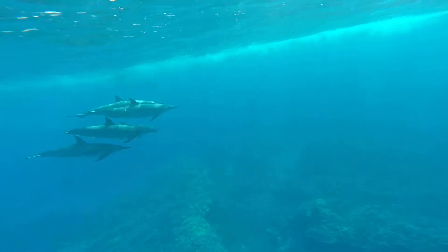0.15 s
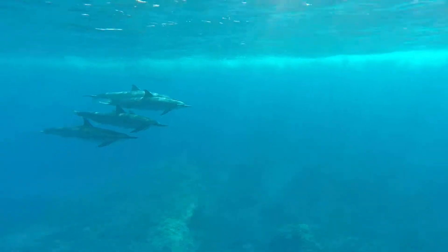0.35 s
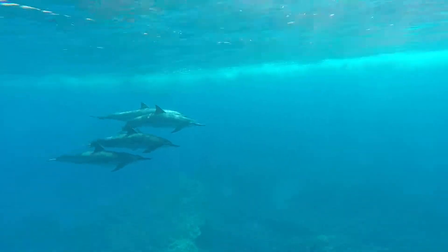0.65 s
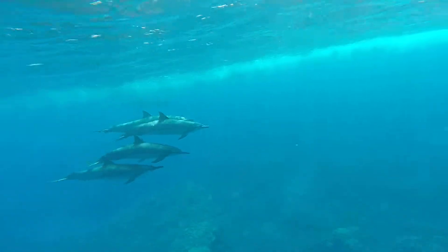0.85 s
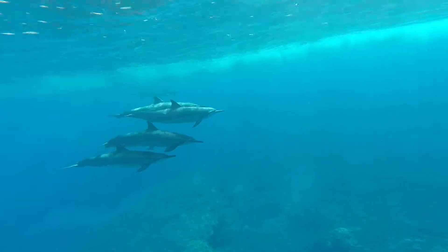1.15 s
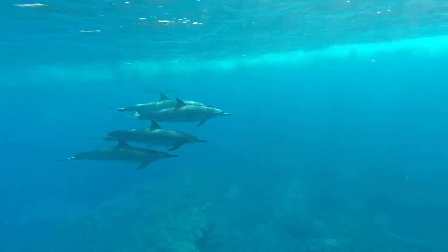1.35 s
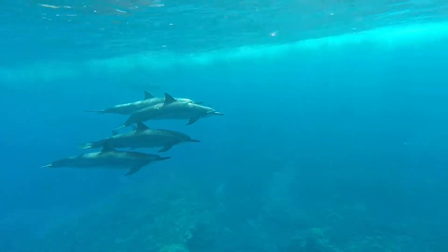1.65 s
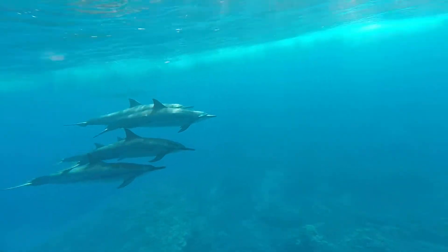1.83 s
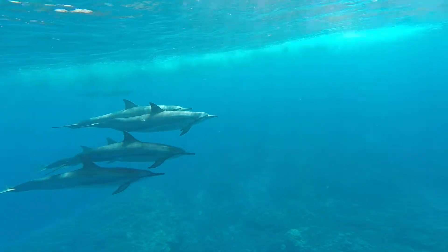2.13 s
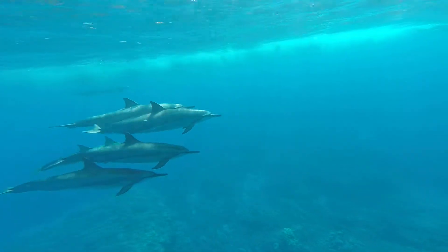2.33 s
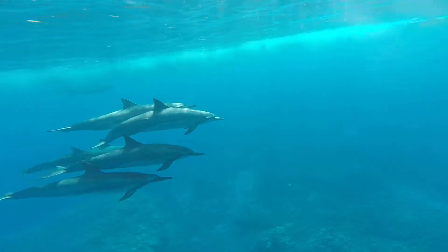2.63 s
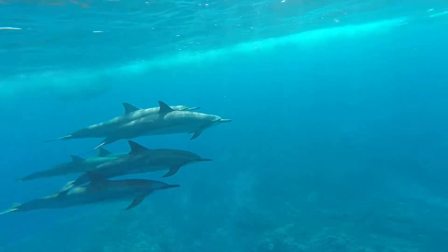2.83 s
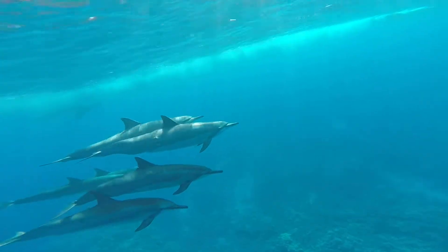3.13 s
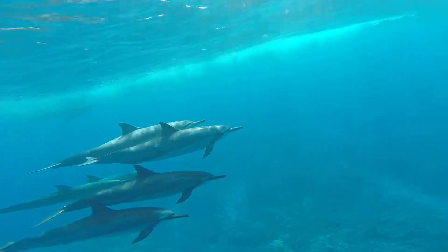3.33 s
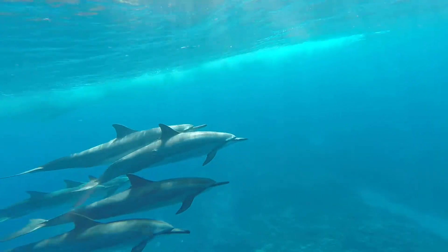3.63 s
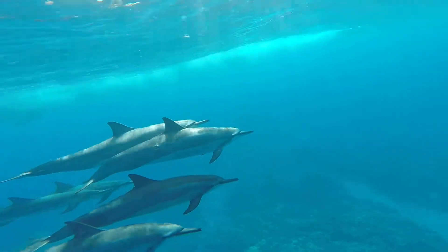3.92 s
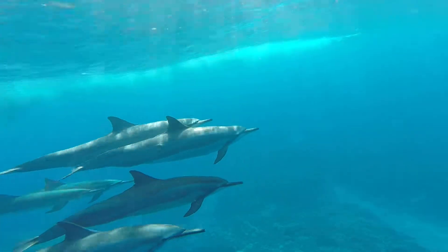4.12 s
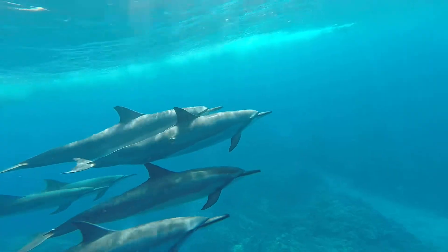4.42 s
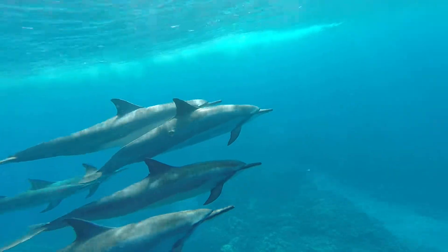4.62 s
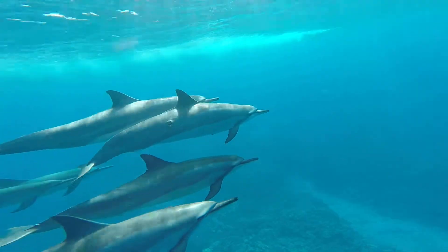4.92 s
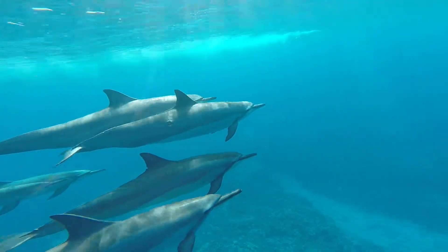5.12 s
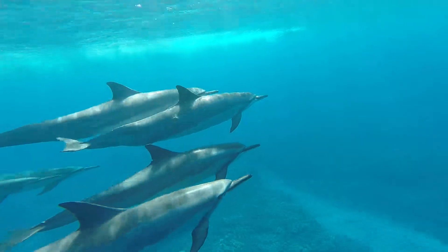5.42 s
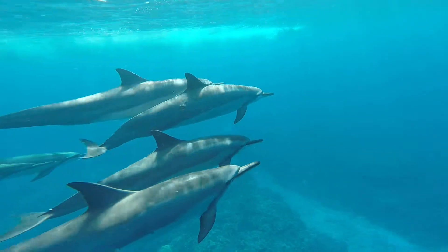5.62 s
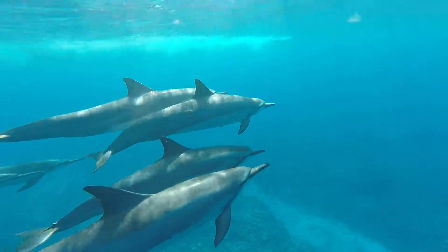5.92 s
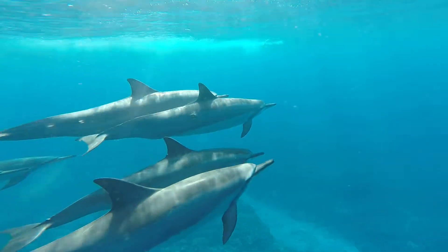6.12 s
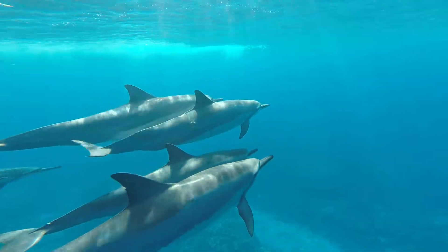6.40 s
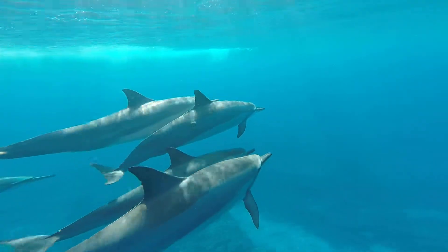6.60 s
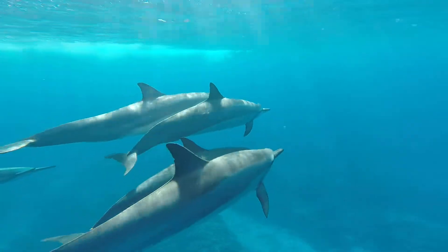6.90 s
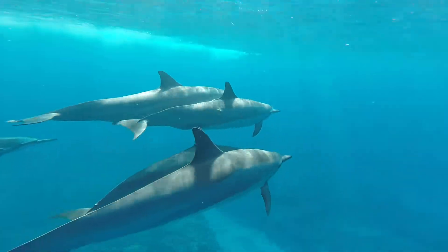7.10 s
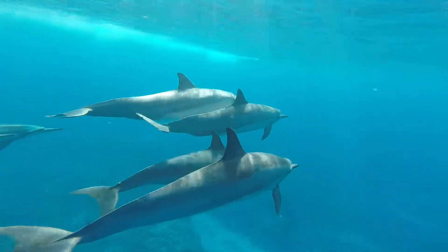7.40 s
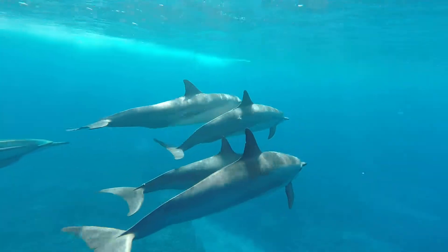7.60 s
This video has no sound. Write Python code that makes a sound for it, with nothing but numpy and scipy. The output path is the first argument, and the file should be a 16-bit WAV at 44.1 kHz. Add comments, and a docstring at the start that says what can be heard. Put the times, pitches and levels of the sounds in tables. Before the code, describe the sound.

Underwater in open sea, heard through a sealed housing: deep uneven swell rumble and a muffled wash that slowly thins. Sparse ticks and small bubble blips come first; around three seconds dolphins send a heavy, hollow knocking click train overlapped by a quicker brighter one. A calmer stretch follows with faint high whistles, then a very short buzz and a final even run of close clicks.

```python
"""Under the surface over a reef, a camera drifts in a sealed housing. Swell and flow are slow shaped-noise rumbles;
surf wash is shaped noise too, and fine bubbles and snapping shrimp are ticks sent through the housing resonances.
Dolphins close by send click trains, pulses that knock those resonances, and faint high whistles, gliding sines.
Bubbles against the case are short rising tones; splashy noise bursts, some of them tails of the buzz clicks, die
fast. Smooth self-noise lies under all.
"""
import sys
import numpy as np
from scipy import signal
from scipy.fft import rfft, irfft, next_fast_len
from scipy.io import wavfile
from scipy.ndimage import uniform_filter1d, map_coordinates

SR = 44100
rng = np.random.default_rng(int(sys.argv[2]) if len(sys.argv) > 2 else 0)


def log_audio(samples):
    """Write samples as a 16-bit WAV file to the path given in sys.argv[1]."""
    # one column per channel
    frames = np.atleast_2d(samples).T
    # limit to full scale, then quantise
    limited = np.clip(frames, -1, 1)
    pcm = np.round(limited * 32767).astype(np.int16)
    wavfile.write(sys.argv[1], SR, pcm)


N = 341775


def amp(db):
    """Amplitude factor of a level in dB."""
    return 10 ** (np.asarray(db) / 20)


def unit(x):
    """x scaled to rms 1."""
    return x / np.sqrt(np.mean(x ** 2) + 1e-20)


def curves(rows):
    """One value per sample for each column after the time."""
    s, *columns = np.transpose(rows)
    return [np.interp(np.arange(N) / SR, s, column) for column in columns]


def wobble(knots_per_s):
    """Smooth random curve through random knots."""
    knots = rng.standard_normal(int(N * knots_per_s / SR) + 4)
    return map_coordinates(knots, [np.arange(N) * knots_per_s / SR])


def filtered(x, response):
    """x times a complex response of frequency."""
    m = next_fast_len(N + SR // 2)
    return irfft(rfft(x, m) * response(np.fft.rfftfreq(m, 1 / SR)), m)[..., :N]


def shaped(spectrum):
    """Noise of rms 1; spectrum points joined on a log frequency axis."""
    point_hz, point_db = np.transpose(spectrum)

    def response(hz):
        return amp(np.interp(np.log(hz + 1), np.log(point_hz), point_db, -120, -120))

    return unit(filtered(rng.standard_normal(N), response))


def ringing(x, modes):
    """x through parallel causal resonances of alternating sign."""
    def response(hz):
        total = 0
        for k, (centre_hz, width_hz, gain_db) in enumerate(modes):
            damping = 1j * hz * width_hz
            total = total + (-1) ** k * amp(gain_db) * damping / (centre_hz ** 2 - hz ** 2 + damping)
        return total

    return filtered(x, response)


def patchy(patchy_db):
    """White noise with patches of random gain in time and frequency."""
    z = signal.stft(rng.standard_normal(N + 512), nperseg=512)[2]
    field = uniform_filter1d(rng.standard_normal(z.shape), 8, 0)
    field = uniform_filter1d(field, 6, 1)
    return unit(signal.istft(z * amp(patchy_db * unit(field)), nperseg=512)[1][:N])


def grains(count, centre_hz, spread, cycles, range_db):
    """Scattered damped ticks, each at its own pitch; many faint, few loud."""
    when, size = rng.random((2, count))
    hz = np.clip(centre_hz * np.exp(spread * rng.standard_normal((count, 1))), 300, 15000)
    turn = hz * np.arange(SR // 150) / SR
    tick = turn * np.exp(-2 * turn / cycles) * np.sin(2 * np.pi * turn)
    tick = amp(range_db * size[:, None] ** 3) * np.sqrt(hz) * tick
    at = (when * N).astype(int)[:, None] + np.arange(turn.shape[1])
    return unit(np.bincount(at.ravel(), tick.ravel(), N + SR)[:N])


# rumble levels: time_s, swell_db, flow_db
RUMBLE_LEVELS = [(0.0, -27.5, -39), (0.5, -37.5, -37.5), (1.38, -26, -45), (1.73, -23.5, -41),
                 (1.75, -34.5, -37), (3.06, -24.5, -47), (3.37, -35, -47), (3.54, -28.5, -37.5),
                 (3.58, -37.5, -45), (3.99, -33, -45), (4.25, -37, -53), (4.32, -26, -42.5),
                 (4.55, -36.5, -49), (4.77, -26, -40), (5.07, -38, -48.5), (5.16, -29.5, -49),
                 (7.66, -38, -48.5), (7.75, -37, -53)]
# wash levels: time_s, surf_db, boom_db
WASH_LEVELS = [(0.0, -41, -42), (0.5, -46.5, -43.5), (2.2, -45.5, -41), (2.44, -47.5, -44),
               (2.91, -45.5, -43.5), (3.26, -43.5, -43), (4.47, -47.5, -44.5), (4.75, -45.5, -43.5),
               (5.31, -52, -47), (5.76, -50, -47), (5.87, -54, -49), (6.58, -54.5, -52), (7.16, -57, -52),
               (7.29, -48, -54), (7.45, -53, -56.5), (7.75, -61, -49)]
# noise spectra, relative: freq_hz, density_db_per_hz
SWELL = [(6, -52), (14, 17), (30, 12), (45, -7.5), (70, -18)]
FLOW = [(30, -62), (48, -2.5), (65, 3.5), (90, -8), (130, -18.5), (200, -30)]
SURF = [(70, -22), (120, -0.5), (170, -1.5), (220, -0.5), (350, -3), (500, -2), (900, -38), (1400, -21),
        (4000, -32)]
# housing resonances, low knock to air: centre_hz, width_hz, gain_db
KNOCK = [(564, 178, 1.5), (769.6, 166.4, 2.5)]
EDGE = [(870, 590, 5), (995, 400, 6), (1132, 80, -1), (1311, 50, -0.5)]
LOW_RING = [(1623, 88, 2.5), (1916, 273, -5)]
HIGH_RING = [(2266, 320, -8), (2782, 154, 0.5)]
SNAP = [(3590, 530, -0.78), (3934, 290, 1.7), (4510, 310, -1.3)]
TREBLE = [(4900, 210, -9), (6065, 520, -2), (7400, 850, -1.5)]
AIR = [(8790, 260, -2.5), (10150, 350, 0), (10950, 850, -7.5), (12350, 520, -7), (14000, 1000, -11.5),
       (14400, 500, -22)]
# middle modes: start level, fade as the surf recedes, share of the boom's swings
RING_DB, RING_FADES_DB_PER_S, RING_FOLLOWS = -52, 1.0, 0.17
HIGH_KEEPS_DB_PER_S = 0.73  # the high ring fades this much slower
HISS_DB = -61.5


def water():
    """Swell and flow rumble; surf wash, fine bubbles and shrimp snaps excite the housing."""
    time_s = np.arange(N) / SR
    swell_db, flow_db = curves(RUMBLE_LEVELS)
    surf_db, boom_db = curves(WASH_LEVELS)
    boom_swing_db = boom_db - uniform_filter1d(boom_db, size=2 * SR)
    ring_db = RING_DB - RING_FADES_DB_PER_S * time_s + RING_FOLLOWS * boom_swing_db
    rumble = amp(swell_db + 3.2 * wobble(5.8)) * shaped(SWELL) + amp(flow_db + 1.2 * wobble(9)) * shaped(FLOW)
    surge = wobble(25)  # slaps of water, shared by surf, boom and ring
    surf = amp(surf_db + 2.33 * wobble(9) + 0.73 * surge) * shaped(SURF)
    boom = unit(ringing(ringing(patchy(patchy_db=2.5), KNOCK), [(569, 444, 0)]))
    boom = amp(boom_db + 0.23 * surge) * boom

    fizz = grains(count=1500, centre_hz=2157, spread=0.396, cycles=5.6, range_db=9.0)
    shrimp = grains(count=4000, centre_hz=8170, spread=0.395, cycles=2.4, range_db=18.5)
    far = grains(count=3000, centre_hz=12300, spread=0.16, cycles=3.0, range_db=20.0)  # thin, no body
    drive = patchy(patchy_db=1.5) + amp(-12.0) * fizz + amp(-6.0) * shrimp

    edge = amp(-5.5) * ringing(drive, EDGE[2:])
    low = amp(1.35 * wobble(12)) * ringing(drive, LOW_RING)
    high_db = -6.5 + HIGH_KEEPS_DB_PER_S * time_s + 1.1 * wobble(14)
    high = amp(high_db) * ringing(drive, HIGH_RING)
    ring = amp(ring_db + 0.81 * surge) * unit(edge + low + high)

    snap = amp(1.8 * wobble(7)) * ringing(drive, SNAP)
    hiss = unit(snap + amp(-2.0) * ringing(drive, TREBLE) + amp(-10.0) * ringing(drive, AIR))
    hiss = amp(HISS_DB + 0.48 * wobble(10)) * hiss
    return rumble + surf + boom + ring + hiss + amp(-75.0) * far


def bursts(times_s, db, life_s, wake):
    """A pulse of energy set by db at each time, partly spread into a brief noisy wake."""
    t = np.arange(SR // 50) / SR
    shape = wake * t / life_s * np.exp(-t / life_s) * rng.standard_normal((len(times_s), len(t)))
    shape[:, 12] -= 1
    shape /= np.linalg.norm(shape, axis=1, keepdims=True)
    at = np.round(times_s * SR).astype(int)[:, None] + np.arange(len(t))
    return np.bincount(at.ravel(), (amp(db)[:, None] * shape).ravel(), N + SR)[:N]


def leaning(s, db, lean_db, modes, life_s, wake):
    """Pulses into a pair of modes, with the weight shifted to the upper one by lean_db."""
    lower = ringing(bursts(s, db - lean_db / 2, life_s, wake), [modes[0]])
    upper = ringing(bursts(s, db + lean_db / 2, life_s, wake), [modes[1]])
    return lower - upper


# strong clicks by sender: slow heavy train, even brighter train, quick buzz, close even train, then
# single clicks: snaps (probably shrimp), a few water slaps, a faint echo;
# knock and ring relative to treble, snap and air to the sender's colour:
# start_s, treble_db, knock_db, ring_db, snap_db, air_db
CLICKS = [
    [(2.9964, -50, 16, 4, 8.0, 2.0), (3.0694, -47, 18, 4.5, 8.0, 0), (3.1388, -44.5, 17.8, 4.5, 6.5, 1.0),
     (3.2374, -43, 19.7, 3.5, 3, 2.5), (3.3538, -36.5, 15.8, -0.5, -0.5, 0.0),
     (3.5089, -35.5, 13.3, 0.5, 1.0, -1), (3.5783, -36, 14.3, -0.5, -0.5, 1),
     (3.6561, -36, 11.4, -0.5, -1.0, 3), (3.7404, -35, 9.4, -1.0, -5.5, 4),
     (3.8437, -35.5, 11, -2, -6.5, 2), (3.9534, -36.0, 11.0, -2, -2.0, -0.5),
     (4.0382, -37.5, 12.6, 0.5, 0.0, 1), (4.1325, -39, 13.0, 1.5, -0.0, 0.5),
     (4.2453, -43.5, 13, 1, 1.5, 1)],
    [(3.2535, -34.0, 10, -8.0, 2.0, 0.5), (3.2939, -34.0, 10, -7, -0.5, -0.5),
     (3.3348, -35.5, 9.5, -8, -1, -0.5), (3.3772, -37.0, 11, -5, 3, 2), (3.4186, -38, 9, -6.5, 2.5, 2.5),
     (3.458, -37.0, 7.0, -8, -1, 2), (3.5059, -35.5, -1, -13, 0, 1), (3.5613, -39, -23, -14, -6, -7)],
    [(6.8783, -36.0, 3.0, 3.5, 0.5, 5), (6.8967, -35.5, 1.5, 0.5, -3, 4.0), (6.9107, -38.5, 1.4, -3, 2, -2),
     (6.9234, -39.5, 1.1, -4, -3, -7.0), (6.9374, -48, 4.9, 4.5, 2.5, -7.5)],
    [(7.1566, -35.5, 6.4, -6.0, 5, -2.5), (7.1821, -35.5, 9.2, -6.5, -5, -0.5),
     (7.215, -36, 8.8, -4.5, 0.0, 2), (7.2619, -35.0, 7.6, -5, -3.0, 1), (7.2918, -36.5, 7.5, -4, -2, 2),
     (7.3193, -33.5, 4.5, -7, -1.5, -0.0), (7.3452, -34.5, 3.0, -6, -2.0, -1),
     (7.3761, -35.0, 1.5, -7, -1, 1), (7.4096, -35.0, 2.7, -5.5, 0, -1), (7.45, -36, 2.5, -3.5, 2, 0.5)],
    [(0.0383, -51, -6, 11.5, 13, 4), (0.0957, -47, -7.0, -5, -1.0, 5.0), (0.184, -45, 3.0, -10.0, 4, -4),
     (0.2054, -44.5, 5, -2.5, 2, -5), (0.2718, -49, -5.5, -9.5, 0, -1.5),
     (0.318, -56, -6.0, -10.0, -7.5, -1.5), (0.4419, -50.5, 19.5, -7, -2, 4.0),
     (0.4873, -50, -4.0, 0.0, 1, 6.0), (0.6055, -52, -13, -13.0, 4.0, -1),
     (0.6943, -60, -7.0, -13.0, -6, -7.5), (0.7442, -65, -12, 9, -4, -3.0), (0.7894, -48, -4.5, -16, -6, 4),
     (0.8829, -50, 19, 5, -6, 5.5), (0.9787, -51, -6.5, -12.5, -10.0, -9.0),
     (1.0555, -53, -7.5, -2, -1.5, 8), (1.1473, -41, 0, -5.5, -10.0, 1.0),
     (1.1672, -46.5, 1, -4.5, 6.0, -1), (1.1884, -54, 16, 4, 14, -4.0), (1.2371, -45, -1, 0, 0, -12),
     (1.3224, -43, -1, -7, -3, 7), (1.4666, -49, -6.5, -10.5, 3, -4), (1.5753, -46.5, 8.0, 7.5, 0, -10.0),
     (1.6167, -36, 16, -1, 2.5, 2), (1.7459, -31, -6, -6.5, -3, -11), (2.0078, -44.0, 13.5, 1.5, -8.5, 1.0),
     (2.0864, -52, 14, 6, 10, -6.5), (2.0986, -45.0, 12, -6.0, 1.5, 3.5),
     (2.174, -48.0, -4.0, -8.0, -2.5, 5), (2.2099, -40.5, -17, -6, -3, -3), (2.2584, -52, 11, -1, 13, 1),
     (2.3032, -44.5, 15, -1, 1.0, 6), (2.3401, -46, -1.5, -6, 3, 5), (2.8365, -51.0, -2.0, -6.0, 6, -4.5),
     (2.8589, -33.5, -1, -7, -10, -8), (2.9058, -43.5, -5, -2.0, 3, 5),
     (3.1647, -42.5, 0.5, -12.5, -9.0, -4.0), (3.209, -47, -8.0, -12.0, -8.0, 3),
     (3.2321, -47, 2, -8, -2.0, -2.0), (3.392, -50.5, -5.5, -9.5, -6.5, 5.0),
     (3.497, -45.5, -11, -11.5, -4.5, 7.0), (3.727, -41, -7.5, -11.5, -7, -3),
     (3.8495, -48.5, -7.5, -11.5, -7.5, 5.5), (3.87, -47.0, -5.0, -7, -4.5, 8),
     (3.8816, -40.5, -10, 2.0, 0.5, -2), (3.9205, -43.0, -1.0, -6, -8.0, 0.0),
     (4.0744, -54, 15.0, 1.0, 11.0, 4.0), (4.1654, -43.5, -2.5, -7.5, -3.5, 1.5),
     (4.3041, -51, -6.0, -10.0, 3.0, -4.0), (4.3725, -40.5, 5.0, -9, 4, -0.5),
     (4.3929, -39, -13, -18.5, -4.5, -2.5), (4.4353, -43, -9.0, -5, -3, -3.5),
     (4.5052, -47, -9.5, -1, -4.0, -1.0), (4.566, -48, -3.0, -9.0, 1.0, -3.5),
     (4.6808, -45.5, -4, -14, 0, 4.0), (4.9995, -47, 4, -10.0, -5.0, 1),
     (5.1128, -37, -11.5, -17.5, -3.5, -6), (5.4016, -43.5, -5, -15, -1, 4), (5.6037, -48.0, 8, -14, 1, 6),
     (5.9115, -47, -5.5, -7, 1.5, -1), (5.9743, -50, 0, -14.0, 9, -5.5), (6.0706, -46, -7, -21.0, 6, -10.0),
     (6.1629, -46, -3, -4, -10.0, -5), (6.2174, -54, 2, -6.0, 2, 15), (6.2667, -49.5, 9.0, 1, 8, -3.0),
     (6.6444, -45, -6, -15, 3, 6), (6.988, -45, -6.5, -11, -1, -8), (7.0125, -44, -9.0, -11.0, 6.5, -2),
     (7.307, -56.0, 2.0, -2.0, 12.0, 9.5), (7.4929, -46.5, -11.5, -11.5, 2.0, -6.5),
     (7.5288, -51, 3, 1, 13, -9.0)],
]
# mode drive by sender, edge over knock, rings over ring, snap and air over treble:
# edge_db, low_ring_db, high_ring_db, snap_db, air_db
COLOURS = [(-24.5, 0.5, -3, -24, -14.5), (-26, 3.5, -3.5, -8.5, -12.5), (-4.5, -4.5, 3.5, 6, -19.5),
           (-12, -5, 0.1, -15.5, -11.5), (-23, -8.5, -5.5, -9, -15)]
# chance change of colour from click to click, by sender: scatter_db
SCATTER_DB = [1, 1, 1, 1, .5]
# favoured modes shift, probably as the animals turn: time_s, low_over_high_ring_db,
# upper_over_lower_knock_db, upper_over_lower_low_ring_db
LEAN = [(2.9, 7, 8, 0), (3.0, 10, 4, -1), (3.1, -1, 8.5, 2), (3.4, -4, 3, -3), (3.51, -8, 3, 15),
        (3.7, -5.5, 2.5, 9), (3.95, 1, 0, 10), (4.25, 7.5, 0, 6), (4.4, 4, 0, 0), (6.85, -9, 0, 0),
        (6.88, 6, -6, 2), (6.9, 1, 11, 9), (6.94, -7, 13, -1), (7.15, -6, -3.5, -6), (7.28, -6, -1.5, -13),
        (7.45, 1, -2.5, -12), (7.5, -7, 0, 0)]
# senders whose knock and low ring shift between their two modes: turns (1 or 0)
TURNS = [1, 0, 1, 1, 0]
# offset from the click time by sender: lag_s (bright: high ring, snap, treble, air)
KNOCK_LAG_S = [-.0003, .0003, -.0004, -.0007, -.0002]
EDGE_LAG_S = [0, -.0015, -.0003, -.001, 0]
BRIGHT_LAG_S = [.0006, .0008, .0005, .0002, .0003]
# noisy tail by sender, relative to the knock and to its edge: knock_tail_db, edge_tail_db
TAIL_DB = [(-17, -7), (-20, -7), (-11, -9), (-13, -7), (-18, -8)]


def clicks():
    """Each click strikes the mode groups of the housing; the balance of the groups belongs to its sender."""
    counts = [len(rows) for rows in CLICKS]

    def by_sender(values):
        return np.repeat(values, counts, axis=0)

    all_rows = [row for rows in CLICKS for row in rows]
    s, db, knock_db, ring_db, more_snap_db, more_air_db = np.transpose(all_rows)
    colour = by_sender(COLOURS)
    colour = colour + by_sender(SCATTER_DB)[:, None] * rng.standard_normal(colour.shape)
    edge_db, low_db, high_db, snap_db, air_db = colour.T
    knock_tail_db, edge_tail_db = by_sender(TAIL_DB).T
    when, *leans = np.transpose(LEAN)
    ring_lean_db, knock_lean_db, low_lean_db = (np.interp(s, when, lean) for lean in leans)
    half_lean_db, turns = ring_lean_db / 2, by_sender(TURNS)
    bright_s = s + by_sender(BRIGHT_LAG_S)
    edge_db = db + knock_db + edge_db + 40.5
    knock_db = db + knock_db + 38.5
    low_db = db + ring_db + low_db + half_lean_db + 41.0
    high_db = db + ring_db + high_db - half_lean_db + 40

    # a second, broad resonance after each group but air limits its spread
    knock_s = s + by_sender(KNOCK_LAG_S)
    knock = leaning(knock_s, knock_db, turns * knock_lean_db, KNOCK, life_s=.0003, wake=0)
    knock_tail = bursts(s + .002, knock_db + knock_tail_db, life_s=.003, wake=3)
    knock = ringing(knock + ringing(knock_tail, KNOCK), [(664, 345, 0)])

    blow = bursts(s + by_sender(EDGE_LAG_S), edge_db, life_s=0.00055, wake=0.14)
    blow = blow + bursts(s, edge_db + edge_tail_db, life_s=.002, wake=3)
    edge = ringing(ringing(blow, EDGE), [(1100, 1200, 0)])

    low = leaning(s, low_db, turns * low_lean_db, LOW_RING, life_s=0.0006, wake=0.12)
    low = ringing(low, [(1820, 830, 0)])

    high = bursts(bright_s, high_db, life_s=0.0008, wake=0.09)
    high = ringing(ringing(high, HIGH_RING), [(2620, 1300, 0)])

    snap = bursts(bright_s, db + snap_db + more_snap_db + 33.5, life_s=.0005, wake=0.1)
    snap = ringing(ringing(snap, SNAP), [(4000, 2400, 0)])

    treble = bursts(bright_s, db + 24.5, life_s=0.00062, wake=0.27)
    treble = ringing(ringing(treble, TREBLE), [(6640, 43000, 0)])

    air = bursts(bright_s, db + air_db + more_air_db + 33.5, life_s=0.0006, wake=0.25)
    return knock + edge + low + high + snap + treble + ringing(air, AIR)


# bubbles against the case, level before the envelope: start_s, level_db, start_pitch_hz, t60_s
BUBBLES = [(.15, -25.5, 212.5, 0.18), (.157, -21, 673, 0.045), (.641, -30, 694, 0.034),
           (0.829, -25, 522, 0.049), (.998, -22, 693, 0.022), (1.496, -26, 520, 0.035),
           (2.276, -17, 650, 0.024), (2.592, -29, 2840, 0.021), (2.593, -37, 3280, .02),
           (2.728, -24, 610, 0.036), (3.899, -24, 630, 0.12), (4.03, -22, 318, 0.026),
           (4.232, -20.5, 616, 0.037), (4.767, -29, 578, 0.084), (4.781, -26, 114, 0.17),
           (4.8, -33.5, 837, 0.12), (5.299, -23.5, 607, 0.028), (5.355, -28.5, 729, 0.035),
           (5.646, -25, 552, 0.11), (5.768, -25.5, 440, 0.085), (5.781, -32.5, 228, 0.19),
           (5.996, -22.5, 705, 0.047), (6.186, -33, 3360, 0.011), (7.434, -23.5, 527, 0.02),
           (7.64, -27.5, 124, 0.071)]


def bubbles():
    """Short soft-edged tones that rise a little."""
    out, t = np.zeros(N + SR), np.arange(SR // 4) / SR
    for s, db, hz, t60 in BUBBLES:
        waver = 0.82 * np.cumsum(rng.standard_normal(len(t))) / np.sqrt(t60 * SR)  # unsteady pitch
        shape = amp(-60 * t / t60) * (1 - np.exp(-t * 12 / t60))
        phase = 2 * np.pi * hz * t * (1 + 0.066 * t / t60) + waver
        out[round(s * SR):][:len(t)] += amp(db) * shape * np.sin(phase)
    return out[:N]


# splashy noise bursts, some of them tails of the buzz clicks:
# start_s, level_db, t60_s, low_part_over_level_db
SPLASHES = [(2.085, -57, .05, -10), (2.258, -55, .03, -14), (3.883, -48, .03, -10), (3.887, -48, 0.05, -10),
            (6.88, -59, 0.049, 13), (6.898, -54, .06, 15), (6.912, -52, 0.036, 19), (6.925, -55, 0.04, 8),
            (6.962, -53, 0.054, -5)]


def splashes():
    """Noise that starts at once, dies fast and rings the modes from low ring to treble and the knock's edge."""
    shape, edge_shape, t = np.zeros(N + SR), np.zeros(N + SR), np.arange(SR // 5) / SR
    for s, db, t60, edge_db in SPLASHES:
        shape[round(s * SR):][:len(t)] += amp(db - 60 * t / t60)
        edge_shape[round(s * SR):][:len(t)] += amp(db + edge_db - 60 * t / t60)
    edge = unit(ringing(ringing(rng.standard_normal(N), EDGE), [(1100, 980, 0)]))
    body = unit(ringing(rng.standard_normal(N), LOW_RING + HIGH_RING + SNAP + TREBLE))
    return shape[:N] * body + edge_shape[:N] * edge


# whistles, one list each, level before flutter: time_s, pitch_hz, level_db
WHISTLES = [
    [(5.545, 11500, -80), (5.563, 11000, -72), (5.58, 10650, -76), (5.605, 10150, -72), (5.615, 10200, -69),
     (5.623, 10250, -72)],
    [(5.685, 10650, -76), (5.702, 11000, -69), (5.722, 10520, -71), (5.737, 10500, -72), (5.76, 10900, -69),
     (5.785, 11250, -60), (5.802, 11250, -66), (5.812, 10750, -69), (5.845, 10400, -73)],
    [(6.05, 11000, -72), (6.1, 12000, -82), (6.14, 12900, -82), (6.162, 13110, -81), (6.212, 13013, -75),
     (6.252, 12478, -84), (6.27, 12062, -81), (6.3, 11600, -77)],
    [(6.38, 15250, -72), (6.392, 15150, -66), (6.4, 14400, -74), (6.409, 13650, -65), (6.417, 13550, -71),
     (6.425, 12900, -76), (6.44, 11700, -77), (6.455, 10700, -76)],
    [(6.585, 8400, -78), (6.592, 10500, -60), (6.605, 11350, -59), (6.65, 11250, -59), (6.71, 11250, -61),
     (6.73, 10900, -64), (6.75, 9600, -58), (6.76, 8000, -58), (6.773, 6800, -58)],
    [(6.655, 10300, -72), (6.685, 10000, -68), (6.71, 9800, -74)],
    [(6.73, 8500, -76), (6.74, 7900, -68), (6.752, 7300, -70)],
    [(6.61, 11850, -79), (6.63, 11750, -75), (6.65, 11700, -80)],
    [(6.74, 11600, -78), (6.77, 11600, -72), (6.8, 11650, -78)],
    [(7.62, 11300, -80), (7.66, 11000, -69), (7.69, 10700, -82)],
    [(7.685, 6250, -72), (7.705, 6600, -66), (7.725, 7150, -67), (7.738, 7400, -70), (7.75, 7300, -68)],
    [(7.7, 10500, -80), (7.73, 11000, -76), (7.75, 11000, -76)],
]
# short flat squeaks, level before lift and flutter: start_s, length_s, pitch_hz, level_db
SQUEAKS = [(2.948, 0.088, 3330, -76), (3.495, .075, 3365, -73), (7.44, 0.076, 3400, -78)]
# squeak partials: multiple, level_db
OVERTONES = [(1, 0), (2, -2), (3, 0), (4, -4)]


def whistles():
    """Gliding sines and flat harmonic squeaks with soft ends that flutter on their way through the water."""
    out, flutter = np.zeros(N + SR), amp(3 * wobble(110) - 1)
    shiver_hz = np.pad(45 * wobble(300), (0, SR))  # small quick pitch scatter
    for rows in WHISTLES:
        s, hz, db = np.transpose(rows)
        t = np.arange(s[0], s[-1], 1 / SR)
        start = round(s[0] * SR)
        glide_hz = uniform_filter1d(np.interp(t, s, hz), size=300, mode="nearest")
        glide_hz = glide_hz + shiver_hz[start:][:len(t)]
        tone = np.sqrt(2) * amp(np.interp(t, s, db)) * np.sin(2 * np.pi * np.cumsum(glide_hz) / SR)
        out[start:][:len(t)] += tone * signal.windows.tukey(len(t), .15)
    for s, length_s, hz, db in SQUEAKS:
        t = np.arange(0, length_s, 1 / SR)
        start = round(s * SR)
        cycles = hz * t + np.cumsum(shiver_hz[start:][:len(t)]) / SR
        stack = sum(amp(level_db) * np.sin(2 * np.pi * round(k) * cycles) for k, level_db in OVERTONES)
        out[start:][:len(t)] += amp(db + 6) * stack * signal.windows.tukey(len(t), .15)
    return out[:N] * flutter


def scene():
    """Sum of all layers, one channel."""
    return (water() + clicks() + bubbles() + splashes() + whistles())[None]


# self-noise spectrum, relative: freq_hz, density_db_per_hz
MIC = [(700, -31), (1200, 1), (3000, -2), (5300, -4.5), (9000, -19), (10600, -11), (13000, -13),
       (15000, -14), (16500, -14)]
TOP_HZ = 16440  # band limit


def record(dry):
    """Smooth self-noise is added; the highest treble is steeply reduced, with nothing above the band limit."""
    def response(hz):
        return (hz < TOP_HZ) * (.03 + 1 / (1 + (hz / 15230) ** 120))

    return filtered(dry + amp(-70.5) * shaped(MIC), response)


dry = scene()
out = record(dry)
log_audio(out)
```